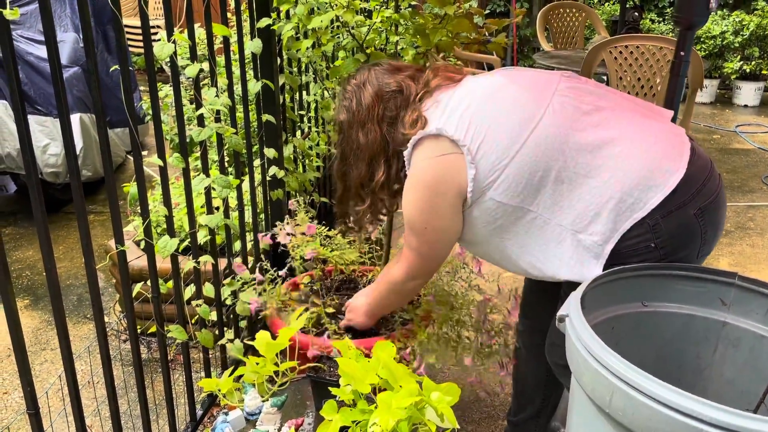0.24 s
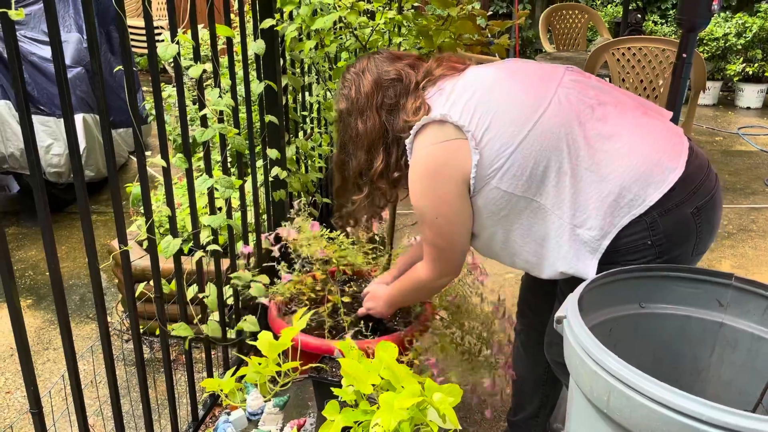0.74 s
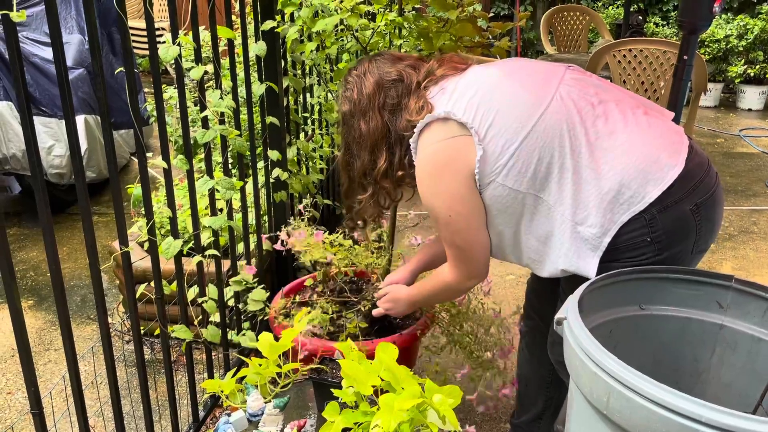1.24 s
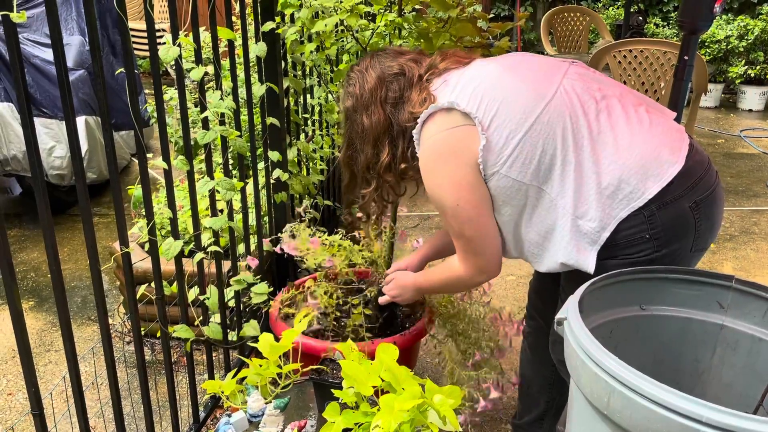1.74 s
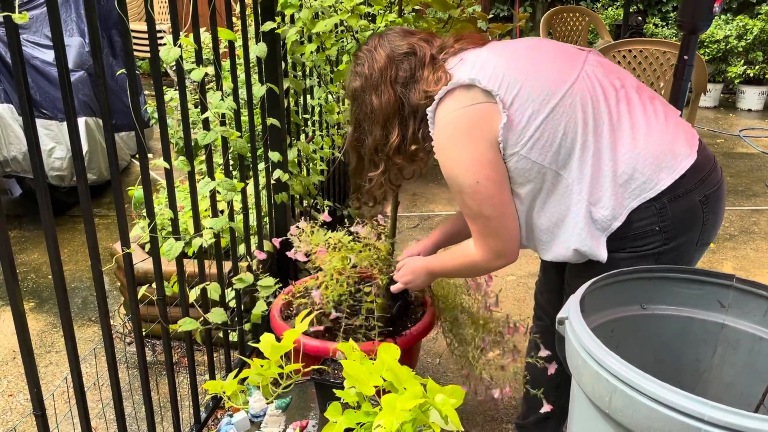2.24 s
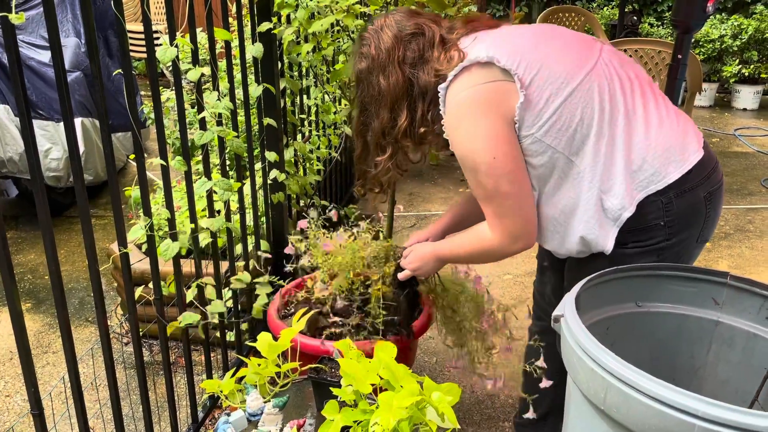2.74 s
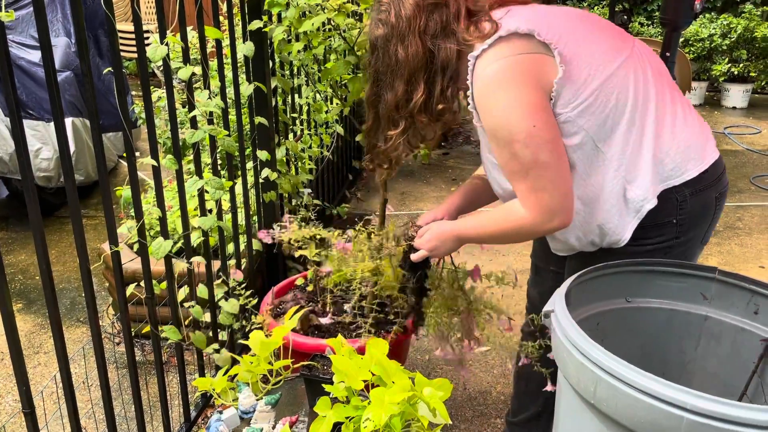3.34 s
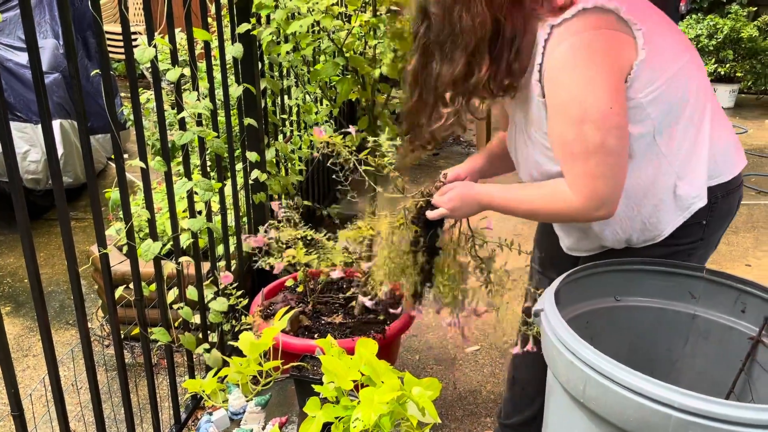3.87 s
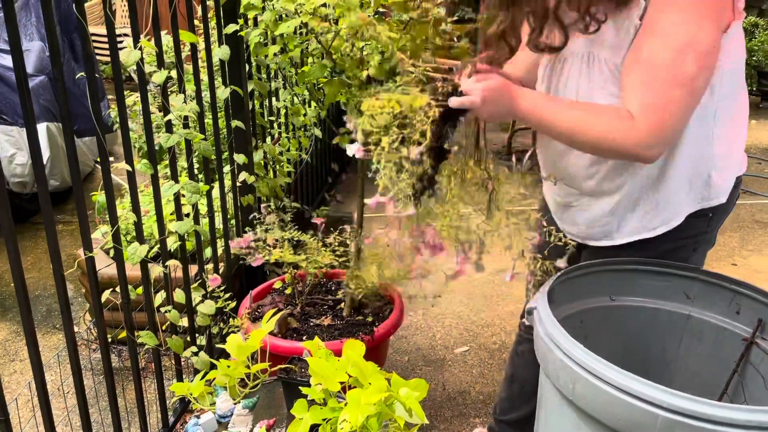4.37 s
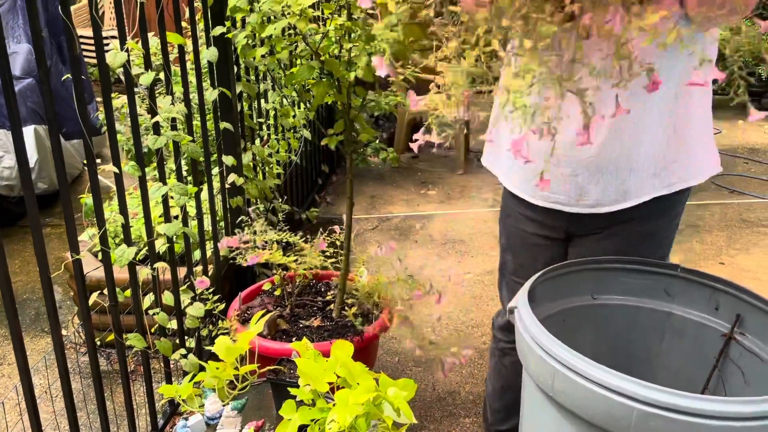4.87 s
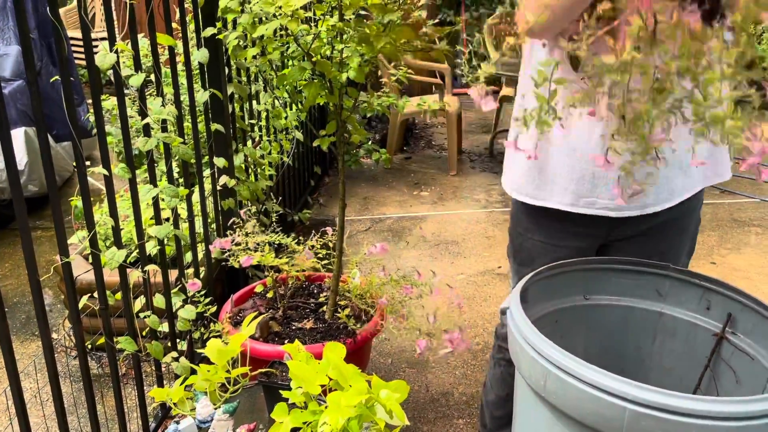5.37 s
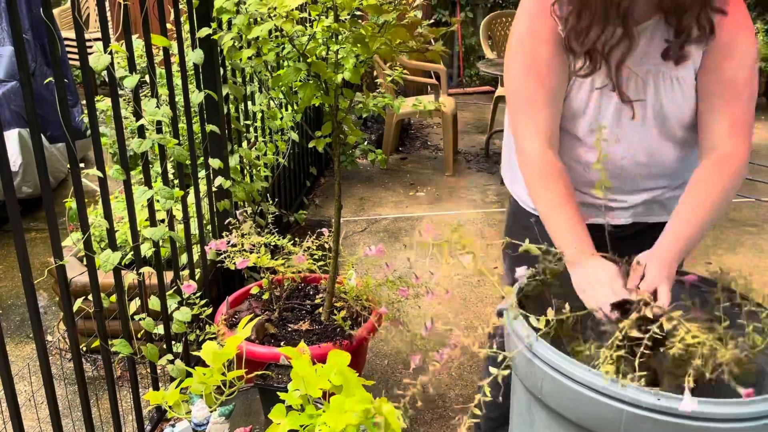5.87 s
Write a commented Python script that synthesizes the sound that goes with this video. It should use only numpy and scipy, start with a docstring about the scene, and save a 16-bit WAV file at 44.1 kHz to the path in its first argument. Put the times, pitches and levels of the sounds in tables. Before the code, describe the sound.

Whining bird mews repeat in a leafy yard, with snapping stems, tearing roots and finally hollow plastic knocks and rustling over low traffic rumble.

```python
"""Mewing bird and repotting

A bird mews six times from the shrubs of a yard, a harmonic voice through a throat, nasal and hoarse at the end.
Shaped noise gives the far traffic rumble and the soft wash of town and leaves. Close by, someone pulls a plant from
its pot: noise bursts snap stems, brief damped low tones thud, and resonances ring the plastic bin it is pushed into.
The left and right channels differ in level and phase by frequency."""
import sys
import numpy as np
from scipy import signal
from scipy.fft import rfft, irfft, next_fast_len
from scipy.io import wavfile
from scipy.ndimage import uniform_filter1d, map_coordinates

SR = 44100
rng = np.random.default_rng(int(sys.argv[2]) if len(sys.argv) > 2 else 0)


def int16_out(signal):
    """Quantize to a 16-bit WAV file."""
    q = np.round(np.clip(np.atleast_2d(signal).T, -1, 1) * 32767)
    wavfile.write(sys.argv[1], SR, q.astype(np.int16))


N = 269451


def amp(db):
    """Decibels as an amplitude ratio."""
    return 10 ** (np.asarray(db) / 20)


def unit(x):
    """Normalisation to an rms of 1."""
    return x / np.sqrt(np.mean(np.abs(x) ** 2) + 1e-20)


def along(points, hz):
    """Interpolation of (Hz, value) points on a logarithmic frequency axis."""
    f, v = np.transpose(points)
    return np.interp(np.log(hz + 1), np.log(f + 1), v)


def over_time(points, t):
    """Linear interpolation of (seconds, value) points."""
    return np.interp(t, *np.transpose(points))


def wobble(rate, size=N):
    """Random modulation: a curve through rate random knots a second."""
    knots = rng.standard_normal(int(size * rate / SR) + 4)
    return map_coordinates(knots, [np.arange(size) * rate / SR], order=1)


def smear(rate, size=N):
    """Narrow-band noise as a random complex envelope, which widens a tone that it multiplies."""
    return wobble(rate, size) + 1j * wobble(rate, size)


def step(t, at, width):
    """A soft transition from 0 to 1."""
    return .5 + .5 * np.tanh((t - at) / width)


def stroke(t, start, length, db, attack, t60):
    """Gain envelope: linear rise, hold and exponential decay."""
    decay_db = 60 * np.clip(t - start - length, 0, None) / t60
    return amp(db - decay_db) * np.clip((t - start) / attack, 0, 1)


def filtered(x, response):
    """Linear filtering: the spectrum of x times a complex response of frequency."""
    m = next_fast_len(N + SR // 2)
    return irfft(rfft(x, m) * response(np.fft.rfftfreq(m, 1 / SR)), m)[..., :N]


# Left-right correlation of the noise and reverberation by frequency.
# Each row: frequency in Hz, correlation from 0 to 1.
CORRELATION = [(60, .985), (160, .93), (300, .75), (450, .5), (750, .05), (2000, .05), (4000, .3),
               (6500, .4), (7800, .8), (8400, .999), (9500, .999), (10000, .6), (12000, .6), (12700, .999)]


def paired(a, b, spectrum):
    """Stereo coherence: two unrelated signals mixed as mid and side to a set correlation."""
    def mid_side(hz):
        turn = np.arccos(np.clip(along(CORRELATION, hz), -1, 1)) / 2
        return spectrum(hz) * [np.cos(turn), np.sin(turn)]

    mid, side = filtered(np.array([a, b]), mid_side)
    return np.array([mid + side, mid - side])


def rush(points, patchy_db):
    """Coloured noise in stereo, of rms 1, with time-frequency patches of random gain."""
    z = signal.stft(rng.standard_normal((2, N + 512)), nperseg=512)[2]
    field = rng.standard_normal(z.shape[1:])
    field = uniform_filter1d(uniform_filter1d(field, 8, 0), 12, 1)
    a, b = signal.istft(z * amp(patchy_db * unit(field)), nperseg=512)[1][:, :N]
    return unit(paired(a, b, lambda hz: amp(along(points, hz))))


# Spectrum of the far rumble. Each row: frequency in Hz, relative density in dB per Hz.
RUMBLE_SPECTRUM = [(13, -73), (25, -56), (35, -36), (44, -15), (64, -1.5), (125, -6.5), (144, -11),
                   (177, -13), (221, -17.5), (255, -23), (295, -24), (400, -28.5), (520, -25.5),
                   (880, -120)]
# Course of the rumble. Each row: time in seconds, level in dB.
RUMBLE_LEVEL = [(0.0, -47), (0.5, -51), (1.29, -43.5), (1.75, -51), (2.5, -46.5), (3.35, -47.5),
                (4.47, -46), (5.2, -48), (5.8, -48.5), (6.11, -44.5)]
# Drones of far engines. Each row: pitch in Hz, random knots a second that widen it, level at the start in dB,
# drift in dB a second.
DRONES = [(62.7, 9, -54, 1), (122.3, 8, -58, -0.8), (165.7, 6.5, -51.5, -2.5)]
# Spectrum of the town's wash. Each row: frequency in Hz, relative density in dB per Hz.
WASH_SPECTRUM = [(150, -1.5), (300, -5), (500, -5), (700, -6.5), (1000, -3.5), (2000, -8), (3500, -10),
                 (5000, -15), (7000, -20.5), (8000, -46), (10000, -63), (14000, -68)]
WASH_DB, WASH_FADE_DB = -45, 0.78  # at the start; lost a second


def town():
    """Broadband and narrow-band noise: engines rumble in lumps and drone; the wash above slowly fades."""
    t = np.arange(N) / SR
    rumble_db = over_time(RUMBLE_LEVEL, t) + 0.66 * wobble(3.27)
    rumble = amp(rumble_db) * rush(RUMBLE_SPECTRUM, patchy_db=0.5)
    drone = np.zeros(N)
    for hz, rate, db, drift_db in DRONES:
        drone += amp(db + drift_db * t) * (smear(rate) * np.exp(2j * np.pi * hz * t)).real
    wash_db = WASH_DB - WASH_FADE_DB * t + 0.71 * wobble(4.86)
    return rumble + drone + amp(wash_db) * rush(WASH_SPECTRUM, patchy_db=1.58)


# Spectrum of the foliage hiss. Each row: frequency in Hz, relative density in dB per Hz.
LEAF_SPECTRUM = [(3000, -66), (6000, -12), (9000, 3), (12000, -3), (13800, -4), (14600, -50), (15700, -44)]
LEAVES_DB, LEAVES_FADE_DB = -56, 1.3  # at the start; lost a second
CRUSH_DB = -9.5  # crushed foliage over the push


def leaves():
    """Friction noise: a faint, fading hiss of foliage all around, and of the plant as it is pushed down."""
    around = amp(LEAVES_DB - LEAVES_FADE_DB * np.arange(N) / SR)
    level = np.hypot(around, amp(CRUSH_DB) * pushing())
    return level * amp(0.19 * wobble(7.8)) * rush(LEAF_SPECTRUM, patchy_db=4.0)


# Snapping stems. Each row: time in seconds, burst level before the band filter in dB, dull part over it in dB.
STEM_SNAPS = [(0.181, -61, -2), (0.613, -38, -7), (0.754, -42, -7), (1.2003, -43, 11), (1.5137, -40, 9.5),
              (2.5503, -43, 5), (3.09, -59.5, 24), (4.845, -41, -15), (4.8514, -45, -13),
              (4.9474, -41.5, -15), (5.108, -45, -9), (5.116, -66, 25), (5.3684, -47, -14),
              (5.4046, -41, -14), (5.882, -39, 3), (5.89, -34, 3), (5.896, -37, 11), (5.906, -44, 5)]
SNAP_T60_S = 0.026


def snaps():
    """Impulsive fracture: each stem gives a short noise burst, a bright band with a duller one."""
    bright, dull = np.zeros((2, N + SR))
    t = np.arange(SR // 20) / SR
    for s, db, low_db in STEM_SNAPS:
        burst = amp(db - 60 * t / SNAP_T60_S) * rng.standard_normal((2, len(t)))
        bright[round(s * SR):][:len(t)] += burst[0]
        dull[round(s * SR):][:len(t)] += burst[1] * amp(low_db)
    band = lambda lo_hz, hi_hz: signal.butter(2, [lo_hz, hi_hz], "band", fs=SR, output="sos")
    return signal.sosfilt(band(8700, 12900), bright[:N]) + signal.sosfilt(band(840, 3000), dull[:N])


# Throat resonances, lower part with the beak nearly shut. Each row: frequency in Hz, gain in dB.
SHUT_LOWER = [(1500, -22), (2250, -1.5), (2700, 1), (3050, 7), (3300, 4), (3650, -10.5), (3950, -11),
              (4400, -16), (4700, -13.5), (5400, -8.5)]
# The upper part, nearly shut. Each row: frequency in Hz, gain in dB before the turn of the head.
SHUT_UPPER = [(5400, -6), (6150, 1), (6900, -6), (7900, -9.5), (8700, -9), (10000, -9), (11000, -15),
              (12400, -15.5), (14000, -37)]
# The lower part with the beak open. Each row: frequency in Hz, gain in dB.
OPEN_LOWER = [(1800, -12.5), (2500, -1), (2700, -0.5), (3000, 1), (3300, -1), (3600, -3.5), (4200, -21),
              (4500, -20), (5000, -14), (5400, -13.5)]
# The upper part, open. Each row: frequency in Hz, gain in dB before the turn of the head.
OPEN_UPPER = [(5400, -8), (6150, 1), (7000, -11.5), (7900, -9), (8700, -16), (10000, -13.5), (11000, -14.5),
              (12400, -21), (14000, -50)]
BEAM_HZ = 5400  # the upper throat begins here


def throat_db(hz, shut, upper_db):
    """Formant filtering; the upper part is beamed and depends on how the head is turned."""
    lower, upper = (SHUT_LOWER, SHUT_UPPER) if shut else (OPEN_LOWER, OPEN_UPPER)
    return np.where(hz < BEAM_HZ, along(lower, hz), along(upper, hz) + upper_db)


# Colour of the hoarse voice. Each row: frequency in Hz before the lift of the low part,
# gain in dB before the turn of the head.
RASP_COLOUR = [(1300, -12.5), (1900, 3.5), (2300, 8), (2900, -4), (3600, -7), (4300, -5), (5200, -16),
               (6000, 3.5), (7000, -6), (8500, -35), (10000, -10), (12500, -10), (14500, -41)]


def rasp_colour_db(hz, lift, upper_db):
    """Formant shift: the low part of the hoarse voice is moved in frequency by the ratio lift."""
    return np.where(hz < BEAM_HZ, along(RASP_COLOUR, hz / lift), along(RASP_COLOUR, hz) + upper_db)


# The six calls. Each row: start in seconds, length in seconds, turn to hoarseness in seconds after the start,
# hoarseness added by that turn (0-1), onset level in dB, loudest moment in seconds after the start,
# level there in dB, level at the turn in dB, last level in dB, odd overtones in dB (reduced from the eighth up),
# upper throat in dB, left over right in dB and lag of the right in radians (both for the lower throat),
# lift of the low rasp as a ratio at first, and at last.
CALLS = [(0.243, 0.31, 0.27, .4, -37, 0.23, -38.5, -41.5, -46, -3.5, -1, 0, 0.94, 1.3, 1.45),
         (0.76, 0.32, 0.25, 0.6, -38.5, 0.23, -35, -36.5, -49, -1, -0.8, 3, 1.23, 1.57, 0.89),
         (1.815, 0.43, 0.27, 0.64, -38.5, 0.25, -33.5, -36, -39.5, -6, -1, -2, 0.06, 1.35, 1),
         (3.118, 0.4, 0.255, 0.76, -36.5, 0.2, -34.5, -36, -38.5, -11, -9.5, 1, 0.06, 1.24, 1.38),
         (4.24, 0.39, 0.3, 0.92, -39, 0.12, -33.5, -38, -41, -4.5, -2, -3, 0.045, 1.02, 1.03),
         (5.545, 0.43, 0.3, 0.71, -38.5, 0.17, -36.5, -38, -43, -7, -6.5, -4, 0.061, 0.99, 1.22)]
# Melody of each call, one list a call. Each row: time in seconds, pitch in Hz.
MELODIES = [
    [(.243, 743), (.262, 838), (.278, 900), (.295, 884), (.315, 895), (.34, 879), (.39, 886), (.42, 863),
     (.445, 811), (.475, 834), (.497, 813), (.52, 737), (.543, 720)],
    [(.76, 752), (.775, 841), (.796, 892), (.822, 889), (.84, 898), (.9, 895.4), (.936, 886), (.96, 846),
     (.99, 838), (1.006, 804), (1.03, 790), (1.06, 739)],
    [(1.815, 684), (1.83, 769), (1.85, 784), (1.881, 805), (1.895, 784), (2.057, 769), (2.095, 760),
     (2.117, 733), (2.14, 760), (2.185, 768), (2.21, 732), (2.245, 718)],
    [(3.118, 691), (3.13, 766), (3.149, 773.4), (3.21, 753), (3.257, 747.3), (3.297, 735.4), (3.365, 740),
     (3.39, 708), (3.41, 762.4), (3.47, 770), (3.518, 769)],
    [(4.24, 670), (4.264, 754), (4.285, 788), (4.306, 766.3), (4.42, 775), (4.484, 753.4), (4.522, 726),
     (4.55, 738.5), (4.61, 733), (4.65, 740)],
    [(5.545, 683), (5.56, 744), (5.58, 783), (5.603, 774), (5.721, 737), (5.76, 722.7), (5.79, 731.4),
     (5.815, 718.5), (5.84, 740), (5.87, 735), (5.895, 690), (5.945, 732)],
]
# Spectrum of the breath. Each row: frequency in Hz, relative gain in dB.
BREATH_COLOUR = [(1200, -71), (2000, 4), (3000, -4), (4500, -8.5), (6200, 2.5), (8000, -3.5), (10000, -17),
                 (12500, -0.5), (14500, -34)]
OPEN_HZ = 850  # calls that rise above this pitch are sung with the beak open
ATTACK_S, RELEASE_S, SILENT_DB = 0.025, 0.036, 15.5  # how fast and far a call rises from and sinks to silence
HALF_DB = -2.5  # hoarse, every second cycle differs: strands halfway between the overtones
CRACK_S, ODD_RISE_S = 0.02, 0.0062  # softness of the turn to hoarseness and of the odd overtones' entry
CLEAR_HOARSE, OPEN_HOARSE = 0.034, 0.18  # hoarseness of the held note; added with the beak open
ONSET_HOARSE, ONSET_S = 0.93, 0.0092  # hoarseness added at the first moment, and its decay
ODD_LATE_DB, ODD_S = -19, 0.061  # with the beak nearly shut the odd overtones come in late
BLUR_RATE, STRAND_RATE = 330, 84.9  # random knots a second that smear clear lines and hoarse strands
BUZZ_HZ, BUZZ_SWING_HZ, BUZZ_WANDER_HZ = 229, 11, 31  # fast tremble of the pitch with the beak open
SHAKE_HZ, FADE_DB = 4, 2.4  # random pitch shake; random swell of the fourth harmonic
RASP_DB = -4
BREATH_DB, PUFF_DB = -15, 20.5  # steady breath; air that escapes as the call opens, over it


def bird():
    """Source and filter: harmonics through the throat, smeared by hoarseness into strands over a rasp."""
    out = np.zeros((2, N))
    for call, melody in zip(CALLS, MELODIES):
        s, length, crack_s, end_hoarse, onset_db, loud_s, loud_db, crack_db, last_db = call[:9]
        held_odd_db, upper_db, left_db, lag, first_lift, last_lift = call[9:]
        size = round(length * SR)
        start, t = round(s * SR), np.arange(size) / SR
        pitch = uniform_filter1d(over_time(melody, s + t), size=300)
        shut = pitch.max() < OPEN_HZ
        cracked = step(t, crack_s, CRACK_S)
        level_db = np.interp(t, [0, ATTACK_S, loud_s, crack_s, length - RELEASE_S, length],
                             [onset_db - SILENT_DB, onset_db, loud_db, crack_db, last_db, last_db - SILENT_DB])
        opening = np.exp(-t / ONSET_S)
        hoarse = CLEAR_HOARSE + OPEN_HOARSE * (1 - shut) + ONSET_HOARSE * opening + end_hoarse * cracked
        hoarse = np.clip(hoarse, 0, .99)
        # the rasp's colour moves from its first lift to its last as the call runs out
        run_out = np.clip((t - crack_s) / (length - crack_s), 0, 1)
        lift = first_lift + (last_lift - first_lift) * run_out
        odd_db = held_odd_db + ODD_LATE_DB * shut * (1 - step(t, ODD_S, ODD_RISE_S))

        def facing(hz):
            """Stereo level and phase difference of the lower throat."""
            left = np.where(hz < BEAM_HZ, amp(left_db / 2) * np.exp(.5j * lag), 1)
            return left ** np.array([[1], [-1]])

        buzz_hz = BUZZ_HZ + BUZZ_WANDER_HZ * wobble(39.7, size)
        buzz = np.sin(2 * np.pi * np.cumsum(buzz_hz) / SR)
        voice_hz = pitch + (1 - shut) * BUZZ_SWING_HZ * buzz + SHAKE_HZ * wobble(91.36, size)
        phase = 2 * np.pi * np.cumsum(voice_hz) / SR
        tones, power = np.zeros((2, size)), 0
        for k in np.arange(2, 18.5, .5 if shut else 1):
            hoarse_db = rasp_colour_db(k * pitch, lift, upper_db)
            held_db = throat_db(k * pitch, shut, upper_db)
            if k % 2 == 1:
                held_db = held_db + odd_db * (1 if k < 8 else 0.4)
            gain = amp(held_db + shut * cracked * (hoarse_db - held_db))
            if k % 1:
                gain = gain * cracked * amp(HALF_DB)
            clear = (.95 - .95 * hoarse) ** (k / 4)  # uneven cycles smear the high overtones first
            wide = smear(BLUR_RATE, size) / np.sqrt(2)
            strand = smear(STRAND_RATE, size) / np.sqrt(2)
            blur = np.sqrt(1 - cracked) * wide + np.sqrt(cracked) * strand
            # each overtone swells and fades, the high ones more
            steady = amp(FADE_DB * np.sqrt(k / 4) * wobble(43.0, size))
            line = gain * (np.sqrt(clear) * steady + np.sqrt(1 - clear) * blur)
            turning = np.exp(1j * (k * phase + rng.uniform(0, 2 * np.pi)))
            tones += (line * turning * facing(k * pitch)).real
            power = power + gain ** 2 / 2

        hz = np.fft.rfftfreq(size, 1 / SR)
        air = rfft(rng.standard_normal(size) * amp(2.5 * wobble(120, size)))  # uneven puffs
        first, last = (unit(irfft(air * amp(rasp_colour_db(hz, ratio, upper_db)) * facing(hz), size))
                       for ratio in (first_lift, last_lift))
        rasp = (1 - run_out) * first + run_out * last
        # air past the vocal folds
        breath = unit(irfft(rfft(rng.standard_normal(size)) * amp(along(BREATH_COLOUR, hz)), size))
        mix = np.sqrt(1 - hoarse ** 2) * tones / np.sqrt(power) + amp(RASP_DB) * hoarse * rasp
        mix += amp(BREATH_DB + PUFF_DB * opening) * breath
        out[:, start:start + size] += amp(level_db) * mix
    return out


# Reverberation of the yard. Each row: frequency in Hz, time to decay by 60 dB in seconds.
YARD_T60 = [(1000, 0.65), (3000, 0.62), (6000, 0.59), (12000, 0.27)]


def yard(x):
    """Reverberation: walls and shrubs answer, and each frequency dies at its own speed."""
    hz, t, z = signal.stft(rng.standard_normal((2, 3 * SR // 4)), SR, nperseg=256)
    decay = amp(-60 * t / along(YARD_T60, hz)[:, None])
    tail = signal.istft(z * decay, SR, nperseg=256)[1]
    late = np.pad(x, (300, 0))[None]  # the answer starts 300 samples later
    wet = signal.fftconvolve(late, tail / np.linalg.norm(tail[0]), axes=1)[:, :N]
    return paired(*wet, lambda hz: 1)


# Brief dips of a band of the voice; overlapping dips add up. Each row: time in seconds,
# depth in dB (negative swells), half width in seconds.
BAND_DIPS = [(3.186, 8, 0.0043), (3.221, 15, 0.01), (3.262, 15, 0.0043), (4.29, 4.5, .008),
             (4.425, 4.5, 0.015), (5.627, 10, 0.0038), (5.643, 2, 0.0034), (5.69, 4, .004),
             (5.75, 8, 0.016), (5.78, 5, 0.022), (3.302, 1, .004), (5.802, 5, 0.0053), (5.835, 2, .005),
             (2.082, -1, 0.0045), (2.19, 3, 0.027), (3.405, 4, 0.023)]


def caught(x, centre_hz=3020, width_hz=420):
    """Band-limited amplitude modulation: the strongest overtone dips while the rest of the voice goes on."""
    t = np.arange(N) / SR
    dip_db = sum(depth_db * np.exp(-((t - at) / width) ** 4) for at, depth_db, width in BAND_DIPS)
    band = filtered(x, lambda hz: np.exp(-((hz - centre_hz) / width_hz) ** 4))
    return x - (1 - amp(-dip_db)) * band


# The root ball tears loose. One row: start in seconds, length in seconds, level in dB.
ROOT_TEAR = (0.855, 0.18, -48)
# Short low thuds, the first within the tearing. Each row: time in seconds,
# level in dB before the rise and decay, pitch in Hz.
LOW_THUDS = [(0.905, -29.5, 235), (4.539, -28.5, 131), (5.275, -32.5, 365)]
TEAR_ATTACK_S, TEAR_T60_S = 0.022, 0.45
TEAR_HZ, TEAR_LOW_HZ, TEAR_SINK_S = 480, 225, .1  # its centre sinks from the first pitch towards the second


def soil():
    """Narrow-band noise and damped oscillation: tearing roots sink in pitch; thuds are brief damped low tones."""
    t = np.arange(N) / SR
    sinking = np.exp(-np.clip(t - ROOT_TEAR[0], 0, None) / TEAR_SINK_S)
    centre_hz = TEAR_LOW_HZ + (TEAR_HZ - TEAR_LOW_HZ) * sinking
    noise = (smear(70) * np.exp(2j * np.pi * np.cumsum(centre_hz) / SR)).real
    tear = stroke(t, *ROOT_TEAR, TEAR_ATTACK_S, TEAR_T60_S) * noise
    out = np.pad(tear, (0, SR))
    t = np.arange(SR // 10) / SR
    for s, db, hz in LOW_THUDS:
        envelope = amp(db - 60 * t / 0.022) * (1 - np.exp(-t / 0.00065))
        out[round(s * SR):][:len(t)] += envelope * np.sin(2 * np.pi * hz * t)
    return out[:N]


# The plant is pressed into the bin. Each row: start in seconds, length in seconds, pressing gain in dB.
BIN_PUSHES = [(5.574, 0.052, -44), (5.689, 0.1, -48), (5.754, 0.12, -43), (5.863, 0.037, -41.5),
              (5.932, 0.045, -44.5), (5.984, 0.11, -44.5)]
PUSH_ATTACK_S, PUSH_T60_S = 0.032, 0.25


def pushing():
    """Superposed force envelopes: how hard the hands press the plant down, as a gain."""
    return sum(stroke(np.arange(N) / SR, *row, PUSH_ATTACK_S, PUSH_T60_S) for row in BIN_PUSHES)


# Resonances of the bin. Each row: frequency in Hz, width in Hz, peak gain of that mode in dB.
BIN_MODES = [(286, 260, -3.5), (577, 160, 1), (900, 164, -1), (1410, 150, -3.5), (1920, 940, -12),
             (6000, 9000, -34)]
# Clods and stems hit the bin. Each row: time in seconds, striking level before the bin in dB,
# frequency that the contact favours in Hz.
BIN_KNOCKS = [(5.574, -39, 540), (5.606, -31, 750), (5.62, -35.5, 545), (5.711, -40, 900),
              (5.726, -32, 1450), (5.753, -30, 990), (5.776, -35, 520), (5.79, -33, 597), (5.81, -33, 620),
              (5.822, -26, 323), (5.847, -25.5, 900), (5.884, -22, 1420), (5.895, -30, 900),
              (5.91, -31, 597), (5.948, -29, 846), (6.005, -24.5, 934), (6.034, -32, 900),
              (6.052, -37, 784)]
CONTACT_T60_S = 0.029  # how long a knock presses on the bin


def stuffing(rate=1200):
    """Modal resonance: about rate soil crumbs a second, rubbing and knocks ring the bin's hollow."""
    crumbs = (rng.random(N) < rate / SR) * rng.standard_normal(N) * amp(3.4 * wobble(60))

    def hollow(f):
        """Sum of resonant modes of alternating sign."""
        return sum((-1) ** k * amp(db) * 1j * f * width / (centre ** 2 - f * f + 1j * f * width)
                   for k, (centre, width, db) in enumerate(BIN_MODES))

    rubbing = 0.5 * rng.standard_normal(N)
    patter = unit(filtered(unit(crumbs) + rubbing, hollow))
    blows, t = np.zeros(N + SR), np.arange(SR // 20) / SR
    for s, db, hz in BIN_KNOCKS:
        tone = np.sin(2 * np.pi * hz * t + rng.uniform(0, 2 * np.pi))
        contact = 0.91 * tone + 0.48 * rng.standard_normal(len(t))
        blows[round(s * SR):][:len(t)] += amp(db - 60 * t / CONTACT_T60_S) * contact * np.clip(t / 0.00067, 0, 1)
    return amp(-2.0) * pushing() * patter + filtered(blows[:N], hollow)


def scene():
    """Superposition of the voice, the handling, their reverberation, the town and the leaves."""
    calls, stems, hands = bird(), snaps(), soil() + stuffing()
    voice = caught(calls + amp(-6.5) * yard(calls.mean(0)))  # the dips shape the echoes too
    answer = yard(amp(-5.0) * hands + amp(-13) * stems)
    return voice + hands + stems + answer + town() + leaves()


# Phase of the left channel against the right. Each row: frequency in Hz, lead of the left in radians.
LEFT_LEAD = [(500, 0.01), (2300, .9), (3100, .7), (3900, -.2), (4700, 1.3), (5400, .8), (6200, -.8),
             (7000, -.7), (7800, -2.5), (8400, -3.14), (9500, -3.14), (10900, -4.6), (12200, -5.5),
             (12800, -6.283)]
# Level of the left channel against the right. Each row: frequency in Hz, left over right in dB.
LEFT_BALANCE = [(100, .9), (1000, .3), (2500, .5), (3500, 2), (4700, 7), (6200, 5), (7000, 6), (7800, 1),
                (8300, 0)]
TOP_HZ = 15719  # band limit


def record(dry):
    """Transfer functions: the two channels differ in level and phase by frequency, up to the band limit."""
    left = lambda hz: amp(along(LEFT_BALANCE, hz) / 2) * np.exp(.5j * along(LEFT_LEAD, hz))
    return filtered(dry, lambda hz: np.array([left(hz), 1 / left(hz)]) * (hz < TOP_HZ))


dry = scene()
out = record(dry)
int16_out(out)
```